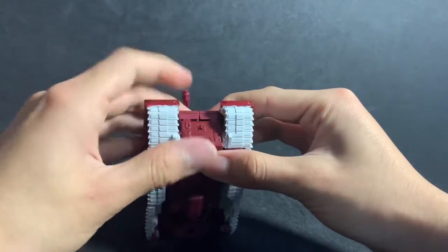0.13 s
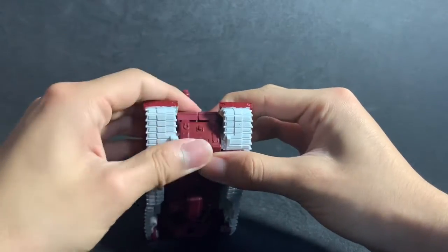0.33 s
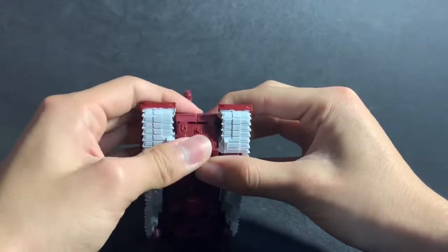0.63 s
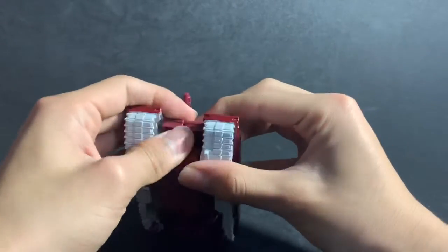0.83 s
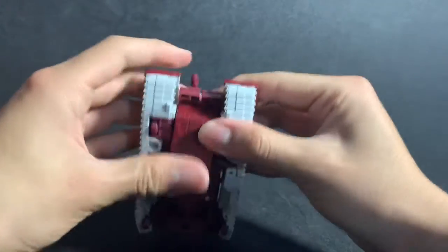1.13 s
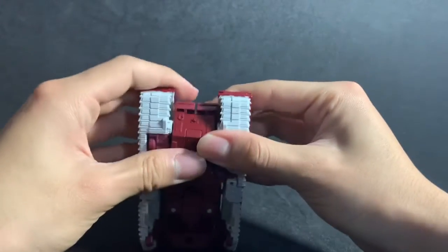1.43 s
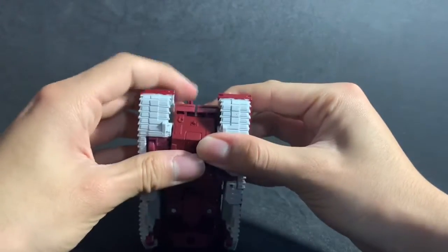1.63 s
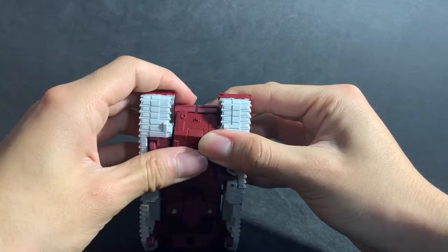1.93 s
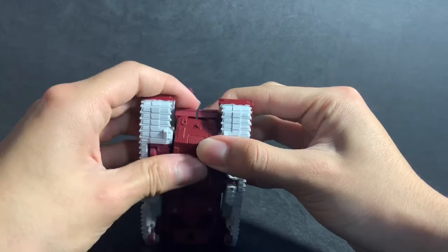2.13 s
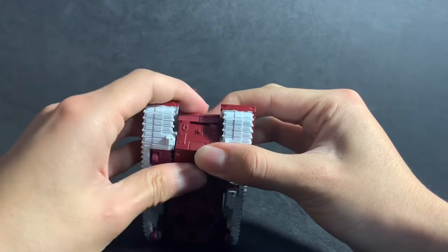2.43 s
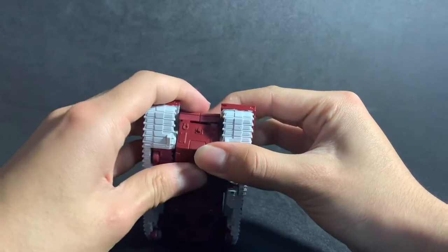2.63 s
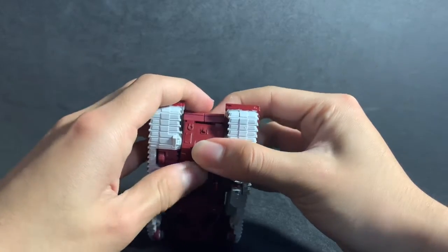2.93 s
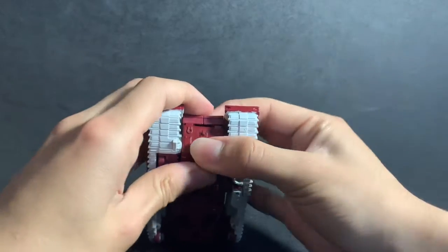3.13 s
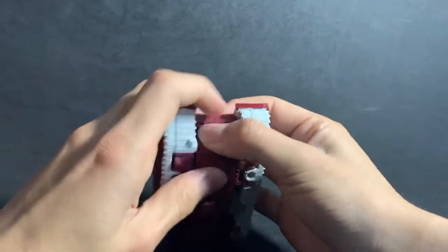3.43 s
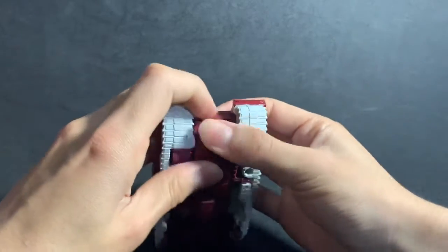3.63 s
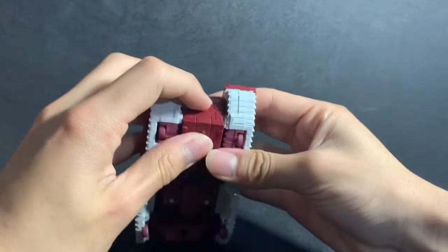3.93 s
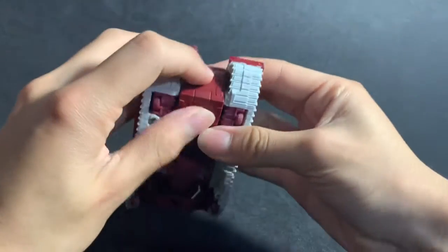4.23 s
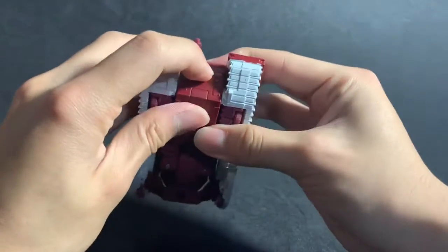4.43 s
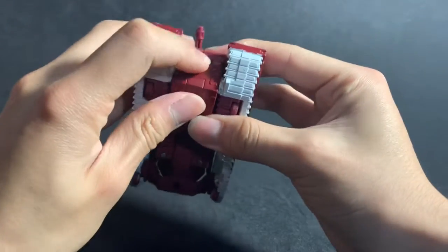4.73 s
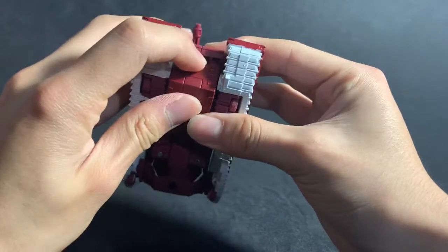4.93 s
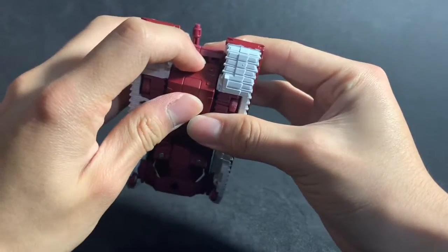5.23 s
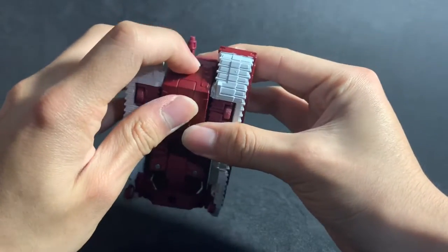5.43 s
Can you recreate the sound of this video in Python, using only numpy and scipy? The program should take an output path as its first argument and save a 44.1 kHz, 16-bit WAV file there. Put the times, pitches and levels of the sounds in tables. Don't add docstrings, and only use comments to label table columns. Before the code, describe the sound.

A quiet small room with low, distant rumble and very faint hiss, heard very close by a small camera microphone. A barely audible fingertip squeak and tiny dry ticks open, with skin rubbing harder until a loud, bright plastic snap at 0.7 s, several blows in a few milliseconds plus a deep thump. Ticks and hollow knocks gather at 0.84-1.05 s, then a softer clean snap at 1.18 and its double-struck partner at 1.23. A sharp tick comes at 1.37, a loud snap at 1.8. From 2.2 to 2.8 s there are light, scattered ticks; from 3.0 they become denser and firmer, with gritty skin slides. Loud snaps hit at 3.38 and 3.69 s, both with thumps, the last the loudest and clipped. Each has a short room tail. Smaller clicks at 3.55 and 3.6 fall between. Then mostly quiet: faint ticks around 4.1-4.35, a knock at 4.8, small clicks and rubs at 5.35-5.5 s.

```python
import sys
import numpy as np
from scipy import signal
from scipy.fft import rfft, irfft, next_fast_len
from scipy.io import wavfile
from scipy.ndimage import uniform_filter1d, map_coordinates

SR = 44100
rng = np.random.default_rng(int(sys.argv[2]) if len(sys.argv) > 2 else 0)


def voltage_ratio(decibels):
    exponent = np.asarray(decibels, float) / 20
    return 10 ** exponent


def persist_wave(psi):
    counts = np.round(np.clip(psi, -1, 1) * 32767).astype(np.int16)
    wavfile.write(sys.argv[1], SR, np.atleast_2d(counts).T)


N = 245625
SPAN = 16384


def unit(x):
    return x / np.sqrt(np.mean(x ** 2) + 1e-20)


def along(points, hz):
    f, v = np.transpose(points)
    return np.interp(np.log(hz + 1), np.log(f + 1), v)


def wobble(rate):
    knots = rng.standard_normal(int(N * rate / SR) + 4)
    return map_coordinates(knots, [np.arange(N) * rate / SR])


def filtered(x, response):
    n = x.shape[-1]
    m = next_fast_len(n + 4096)
    return irfft(rfft(x, m) * response(np.fft.rfftfreq(m, 1 / SR)), m)[..., :n]


def resonances(peaks):
    def response(f):
        return sum((-1) ** k * voltage_ratio(db) * 1j * f * width / (hz * hz - f * f + 1j * f * width)
                   for k, (hz, width, db) in enumerate(peaks))
    return response


def noise(spectrum, alike):
    a = rng.standard_normal((3, N))
    alike = np.clip(alike, 0, 1)
    pair = np.sqrt(alike) * a[0] + np.sqrt(1 - alike) * a[1:]
    return unit(filtered(pair, lambda hz: voltage_ratio(along(spectrum, hz))))


def pressure(start, hold, rise, fall):
    t = np.arange(N) / SR - start
    return voltage_ratio(20 * np.minimum(np.minimum(t / rise, (hold - t) / fall), 0))


def burst(start, length):
    u = np.maximum(np.arange(SPAN) / SR - start, 0) / max(length, .0004)
    return u ** .6 * np.exp(-u ** 1.4 * 2.5)


def chatter(shape, apart):
    a = rng.standard_normal((3, SPAN))
    uneven = voltage_ratio(2 * rng.standard_normal(SPAN))
    z = rfft(shape * uneven * (a[0] + apart * a[1:]))
    broad = np.abs(uniform_filter1d(np.abs(z) ** 2, size=450))
    return irfft(z / np.sqrt(broad + 1e-9), SPAN) * (shape > 1e-9)


# (frequency [Hz], t60 [s])
ROOM_T60 = [(200, 0.37), (1000, 0.23), (4000, 0.21), (9000, 0.25), (15000, 0.18)]


def echo(x, db, power):
    hz, t, z = signal.stft(rng.standard_normal((2, SPAN)), SR, nperseg=256)
    patches = uniform_filter1d(rng.standard_normal(z.shape[1:]), size=2, axis=0)
    patches = unit(uniform_filter1d(patches, size=6, axis=1))
    walls = 3 * np.exp(-t / .05) * rng.standard_normal(len(t))
    decay = 60 * t / along(ROOM_T60, hz)[:, None]
    tail = signal.istft(z * voltage_ratio(3.5 * patches + walls - decay), SR, nperseg=256)[1]
    tail = np.pad(tail, ((0, 0), (220, 0)))[:, :SPAN]
    treble_end = 1 + (np.fft.rfftfreq(SPAN, 1 / SR) / 14700) ** 60
    tail = irfft(rfft(tail) * np.sqrt(np.abs(power) / treble_end), SPAN)
    return x + voltage_ratio(db) * tail * np.linalg.norm(x) / np.linalg.norm(tail)


def add(out, s, x):
    out[:, round(s * SR):][:, :SPAN] += x


# (frequency [Hz], level [dB per Hz])
RUMBLE = [(15, -33.5), (25, -14.5), (65, -0.5), (152, -12), (193, -16.5), (281, -17), (500, -30),
          (650, -50.5), (1100, -120)]
# (frequency [Hz], level [dB per Hz])
HISS = [(150, -30), (300, 2.5), (700, -3.5), (2200, -8.5), (5000, -10.5), (8000, -12), (10000, -11.5),
        (14300, -10), (14900, -70.5)]
# (time [s], width [s], extra rumble [dB])
SHAKES = [
    (.02, .2, 2.5),
    (1.01, 0.12, 9),
    (3.4, 0.47, 4),
]


def room_tone():
    t = np.arange(N) / SR
    rumble_db = -64 + sum(db * np.exp(-((t - s) / width) ** 2) for s, width, db in SHAKES)
    rumble = voltage_ratio(rumble_db + 2.2 * wobble(12)) * noise(RUMBLE, 0.55)
    return rumble + voltage_ratio(-70.5) * noise(HISS, .1)


GRIP_S, LET_GO_S = .013, .03
# (frequency [Hz], level [dB per Hz])
SKIN = [(1800, -12.5), (3800, -4), (5500, -1), (7300, -4), (9000, -23.5)]
# (frequency [Hz], level [dB per Hz])
SKIN_HISS = [(6500, -18.5), (9000, 3.5), (11000, -0.5), (14300, -2), (15000, -58.5)]
# (frequency [Hz], level [dB per Hz])
SKIN_BODY = [(200, -20), (500, -5.5), (1100, -1.5), (2100, 0), (3000, -17.5)]
# (start [s], hold [s], level [dB], hiss [dB], body [dB])
STROKES = [(0.139, 0.012, -66, -3, -17), (0.18, .004, -66.5, -20.5, -7.5),
           (0.579, 0.026, -74.5, -13.5, -7.5), (0.973, 0.052, -62, 11, -5), (1.042, 0.0082, -60.5, 10, 7),
           (1.07, 0.037, -76.5, 10, -10), (1.091, 0.013, -66, 0.5, -15), (1.189, 0.04, -59, -8, -4),
           (1.359, 0.0091, -55.5, 9.5, -7), (1.411, 0.044, -66.5, 6, 1.5), (1.938, .12, -66.5, 5, 3.5),
           (2.671, 0.031, -57.5, 7, -9.5), (2.164, 0.31, -80, 0.5, -7), (2.896, 0.012, -67, 12, -13.5),
           (3.007, 0.0109, -58.5, -7, -3), (3.055, 0.014, -71.5, 16, 0.5), (3.174, 0.059, -60.5, 1, 0.15),
           (3.336, 0.032, -63, 3, -6), (3.549, .01, -54, -19, 2.5), (3.604, 0.057, -58.5, 5, -0.5),
           (3.799, 0.056, -63, -5.5, 3), (4.112, 0.076, -74.5, -1.5, -7), (4.2, 0.026, -64, -0.5, -21.5),
           (4.808, 0.0098, -61, -6, -13), (5.35, .02, -63.5, -4.5, -8.5), (5.376, 0.017, -56, -10, -13.5),
           (5.489, 0.012, -68.5, -19, 3)]
# (end [s], time to gain 20 dB [s], level [dB], hiss [dB], body [dB])
PRESSES = [
    (.7, 0.09, -54, 4.5, -14.5),
    (1.178, 0.03, -49, 2, 2),
    (1.229, 0.02, -57, -0.5, -4),
    (3.383, .015, -55, -3, -6),
    (3.688, 0.03, -52.5, -3.5, -8),
]


def rubbing():
    touches = [(pressure(s, hold, GRIP_S, LET_GO_S), *db) for s, hold, *db in STROKES]
    touches += [(pressure(s, 0, rise, GRIP_S), *db) for s, rise, *db in PRESSES]
    skin, hiss, body = sum(gain * voltage_ratio([[db], [db + hiss_db], [db + body_db]])
                           for gain, db, hiss_db, body_db in touches)
    grit = unit(voltage_ratio(3.5 * wobble(300) + 0.6 * wobble(60)))

    def uneven():
        return unit(voltage_ratio(1.6 * wobble(30)))

    ribs = resonances([(3750, 700, 0), (7350, 700, 0)])
    shell = unit(filtered(noise(SKIN, 0.54), lambda f: 1.0 + ribs(f)))
    rub = skin * uneven() * shell
    rub = rub + hiss * uneven() * noise(SKIN_HISS, 0.38)
    rub = rub + body * uneven() * noise(SKIN_BODY, 0.19)
    return grit * rub


# (start [s], length [s], level [dB], frequency [Hz], width [Hz])
SQUEAKS = [
    (0.001, .15, -75.5, 7020, 305),
    (0.5, 0.089, -79, 3650, 300),
    (1.091, .016, -66, 4200, 600),
    (.975, 0.034, -63.5, 5160, 700),
    (4.6, .03, -72, 4050, 700),
    (1.19, .03, -56, 13700, 900),
]


def squeaks():
    out = np.zeros(N)
    for s, hold, db, hz, width in SQUEAKS:
        rib = resonances([(hz, width, 0)])
        band = unit(filtered(rng.standard_normal(N), lambda f: rib(f) ** 2))
        out += voltage_ratio(db + 3.5 * wobble(53)) * pressure(s, hold, GRIP_S, GRIP_S) * band
    return out


# (time [s], peak [dB], frequency [Hz], t60 [s])
BUMPS = [(.15, -52.5, 191, 0.064), (.839, -42, 1450, 0.035), (1.504, -46, 1233, 0.037),
         (2.622, -50, 1310, 0.032), (1.171, -32, 1450, 0.032), (0.986, -41, 302, 0.08),
         (1.015, -45.5, 227.2, 0.22), (1.047, -36, 419.7, 0.024), (1.978, -55, 279, 0.12),
         (2.766, -47.5, 326, 0.074), (3.014, -49, 300, .06), (3.187, -44, 322, 0.085),
         (3.237, -55.5, 347, 0.13), (3.786, -37.5, 1511, 0.11), (4.81, -50.5, 900, 0.03),
         (5.371, -53.5, 329.8, 0.048)]


def bumps():
    out, t = np.zeros((2, N + SPAN)), np.arange(SPAN) / SR
    for s, db, hz, t60 in BUMPS:
        drift = np.cumsum(rng.standard_normal(SPAN)) * 0.14
        envelope = voltage_ratio(db - 60 * t / t60) * (1 - np.exp(-t / 0.0024))
        add(out, s, envelope * np.sin(2 * np.pi * hz * t + drift))
    return out[:, :N]


# (time [s], peak [dB], frequency [Hz], t60 [s])
THUMPS = [(0.707, -23, 89, 0.13), (.708, -35, 250, 0.11), (.735, -42.5, 159, 0.14),
          (0.776, -40, 85.6, 0.11), (.99, -43, 159, 0.095), (1.029, -42, 135.4, 0.053),
          (1.045, -47, 85.7, 0.11), (1.245, -49.5, 129.8, 0.11), (1.798, -45, 119.6, 0.13),
          (3.39, -25, 80, 0.11), (3.387, -32, 160, 0.14), (3.44, -39, 164.6, 0.11), (3.45, -41.5, 70, .2),
          (3.697, -27, 110, .08), (3.693, -33.5, 298.2, .07), (3.695, -35, 45.05, 0.16),
          (3.78, -42, 165.4, 0.15), (3.8, -43.5, 80, 0.13)]


def thumps():
    out, t = np.zeros((2, N + SPAN)), np.arange(SPAN) / SR
    for s, db, hz, t60 in THUMPS:
        turns = hz * (t + 0.0044 * (1 - np.exp(-t / 0.0048)))
        envelope = voltage_ratio(db - 60 * t / t60) * (1 - np.exp(-t / 0.0061))
        add(out, s, envelope * np.sin(2 * np.pi * turns))
    return out[:, :N]


# (time [s], peak [dB], ring [Hz], crack [dB])
TICKS = [(0.1435, -46, 7260, -22), (0.153, -55, 4380, -23), (0.182, -43, 3500, -28),
         (0.5709, -51, 6560, -14), (0.943, -38.5, 7250, -23), (0.952, -45, 7266, -22),
         (.986, -34, 4870, -1.5), (1.74, -52, 4300, -9), (2.17, -45, 3870, -19), (2.199, -54.5, 6923, 6),
         (2.2054, -38.5, 3710, -24), (2.233, -37, 3710, -5.5), (2.267, -43.5, 3480, -35),
         (2.311, -49, 7640, -4.5), (2.4521, -53, 3390, 2.5), (2.458, -57, 6500, 6),
         (2.583, -46.5, 7600, -4.5), (2.7936, -41, 6050, -26), (2.9484, -47.5, 4450, -12.5),
         (2.974, -52, 5180, 0), (3.4101, -32, 2935, -17), (3.626, -45.5, 3200, -19),
         (4.0848, -55.5, 5420, -4), (4.3082, -44, 2614, -22.5), (4.351, -43, 3536, -7.5),
         (5.3753, -34, 3260, -17.5)]
# (time [s], peak [dB], ring [Hz], knock [dB], crack [dB])
KNOCKS = [(0.8389, -58, 3058, -6, -25.5), (.858, -26, 4054, -7, -17.5), (0.9684, -39, 5090, -6.5, -2),
          (.9989, -37.5, 4630, -6, -19.5), (1.0434, -48, 4700, 3.5, 8.5), (1.1625, -43.5, 4000, 6, -11.5),
          (1.171, -37.5, 3500, 8, -12.5), (1.366, -25.5, 4100, -12.5, -13.5),
          (1.5044, -49.5, 2960, 6.5, -29.5), (1.7495, -51.5, 4260, 2.5, -16), (2.303, -42, 3730, -7.5, -8),
          (2.387, -48.5, 4090, -7.5, -5), (2.4336, -63, 3590, 14, -7), (2.6222, -54, 3740, 8.5, -13),
          (2.6666, -49.5, 3230, 6, -4), (2.7673, -44, 6250, -9.5, -9), (3.014, -38.5, 3970, 3.5, -13),
          (3.0239, -39.5, 2610, -13, -10.5),
          (3.1055, -51, 3577, 4, -20.5), (3.1661, -36.5, 8390, 1.3, -11), (3.137, -53.5, 3500, 4, -20),
               (3.1823, -24, 2576, -7, -12.5), (3.2202, -36.5, 3430, -5.5, 1),
               (3.3221, -54, 2690, -8.5, -10), (3.336, -30, 8220, -10, -4), (3.3593, -35, 3500, -6.5, -8.5),
               (3.549, -31, 3000, -2, -19), (3.606, -31, 4078, 2.5, -3.5), (4.809, -39, 2796, 0, -13),
               (5.383, -39.5, 4100, -2, -20), (5.4937, -46.5, 3720, 3.5, -20)]
# (frequency [Hz], level [dB])
TICK_SENT = [(300, -8), (2500, 11.5), (6000, -4.5), (10000, -9.5), (15000, -12.5)]
DRY_KNOCK_DB, TICK_ROOM_DB, KNOCK_ROOM_DB = -23, -10, -9.5
TICK_S, LONGER_PER_DB = 0.00091, 0.07


def ticks():
    out, hz = np.zeros((2, N + SPAN)), np.fft.rfftfreq(SPAN, 1 / SR)
    slips = [(s, db, ring_hz, DRY_KNOCK_DB, crack_db, TICK_ROOM_DB) for s, db, ring_hz, crack_db in TICKS]
    slips += [(*row, KNOCK_ROOM_DB) for row in KNOCKS]
    for s, db, ring_hz, knock_db, crack_db, room_db in slips:
        length = TICK_S * max(1.5 + LONGER_PER_DB * (db + 45.5), .5)
        blow = chatter(burst(0, length), apart=0.95)[:, :2048]
        ring = [(ring_hz, 850, 0), (1.7 * ring_hz, 900, -8), (5000, 5000, -17)]
        hollow = [(595, 2600, -10.0), (1050, 1400, 1.5), (1640, 1500, 2)]
        crack = [(9800, 12000, 0.0045), (13700, 1200, 0.0008)]
        tick = 0
        for level, peaks in [(0, ring), (knock_db - 0.5, hollow), (crack_db + 3.0, crack)]:
            rung = filtered(blow, resonances(peaks))
            tick = tick + voltage_ratio(db + level) * rung / np.abs(rung[0]).max()
        tick = tick * voltage_ratio([[0], [-2.5]])
        tick = np.pad(tick, ((0, 0), (0, SPAN - 2048)))
        broad = uniform_filter1d(np.abs(rfft(tick[0])) ** 2, size=300)
        add(out, s, echo(tick, room_db, broad * voltage_ratio(2 * along(TICK_SENT, hz))))
    return out[:, :N]


# (time [s], peak [dB], room [dB])
SNAPS = [
    (0.7052, -0.5, -10),
    (1.1801, -8.5, -15.5),
    (1.2305, -12, -11),
    (1.7936, -2, -12.5),
    (3.382, -2.5, -13.5),
    (3.6907, 3.5, -11),
]
# (time [s], level [dB], length [s])
BLOWS = [
    [(.7058, -4, .0025), (.7082, -0.5, 0.0022), (.7104, -3, .002), (.7152, -14, .003), (.7243, -19.5, .002),
     (.7298, -17.5, 0.0015), (.7352, -21.5, .0015)],
    [(1.1804, 0, .0015)],
    [(1.2308, -4, 0.0018), (1.232, -0.5, .002), (1.2404, -20, .0015)],
    [(1.7945, -25, .003), (1.7977, 1.5, .002), (1.8013, -14.5, .002), (1.8053, -19.5, .002),
     (1.8135, -21.5, .002), (1.83, -24, .0015)],
    [(3.3825, -16.5, .003), (3.3852, -6, .0025), (3.3876, 0, .0014), (3.3913, -12, 0.0019),
     (3.4022, -21.5, .003), (3.4065, -23, .002)],
    [(3.6911, 1, .0018), (3.693, 1.5, 0.00094), (3.6944, -2.5, 0.0013), (3.697, -14.5, 0.0022),
     (3.7008, -16.5, 0.0017), (3.7042, -20, .0015), (3.7088, -22.5, .003)],
]
# (frequency [Hz], width [Hz], level [dB])
SHELLS = [
    [(1667, 980, -11), (3270, 200, -3.5), (3710, 110, -5), (5168, 850, -7), (7520, 860, -15),
     (7700, 200, -15), (7943, 810, -18.5), (11180, 370, -2), (13640, 310, -7)],
    [(1450, 310, -11), (4300, 360, -5), (6140, 370, -2), (8240, 240, -4), (10200, 600, -10.5),
     (14200, 900, 2.5)],
    [(1071, 500, -7.5), (3500, 1500, -5), (6180, 110, -5), (7600, 2400, -3), (9200, 880, -6),
     (12300, 1500, -3)],
]
# (frequency [Hz], width [Hz], level [dB])
LATE_SHELLS = [
    [(1430, 420, -8.5), (3695, 250, -9.5), (4300, 560, 1.5), (5355, 390, 6.5), (6050, 520, 1.5),
     (6950, 230, -8.5), (7600, 750, -5.5), (10716, 680, 2), (12500, 370, -15.5)],
    [(1120, 250, -9.5), (3000, 330, 0.5), (4630, 330, -2), (5125, 120, 2), (6500, 160, -5.5),
     (8100, 580, -6), (10460, 240, -3.5), (10800, 440, -5.5), (12900, 220, -10.5)],
    [(2500, 160, -5.5), (4300, 320, -3), (5800, 1100, -9.5), (7270, 490, -1.5), (8000, 160, -10),
     (10100, 260, -15), (10270, 5200, -16), (13580, 560, -15.5), (13400, 330, -16.5)],
]
# (frequency [Hz], level [dB per Hz])
SENT = [
    [(150, -39), (250, -15), (788, -21.5), (3680, -4), (10300, -25.5), (11800, -23.5), (13500, -12.5),
     (15000, -31.5)],
    [(150, -50.5), (250, -24.5), (5010, -7), (5850, -2), (11800, -18), (13800, -1), (15000, -19.5)],
    [(150, -42), (250, -16.5), (1670, -15.5), (2530, 0), (11800, -20), (13300, -15.5), (15000, -29)],
    [(150, -50), (250, -27), (2500, -12.5), (5380, -2), (10600, -17), (12000, -22.5), (13300, -14),
     (15000, -43.5)],
    [(150, -39), (250, -13), (2100, -14), (3050, -2.5), (10600, -19.5), (11800, -18), (13100, -14),
     (15000, -31.5)],
    [(150, -33), (250, -10.5), (1050, -22), (2400, -1.5), (7180, -7.5), (11600, -19.5), (13100, -17),
     (15000, -62)],
]
SOFT_HZ, SOFT_LOSS = 6000, 0.7


def snaps():
    out, hz = np.zeros((2, N + SPAN)), np.fft.rfftfreq(SPAN, 1 / SR)
    for (s, db, room_db), blows, peaks, sent in zip(SNAPS, BLOWS, SHELLS + LATE_SHELLS, SENT):
        shell = resonances(peaks)
        shape = sum(voltage_ratio(level) * burst(at - s, length) for at, level, length in blows)
        crisp = sum(voltage_ratio(level * (1 + SOFT_LOSS)) * burst(at - s, length) for at, level, length in blows)
        blow = chatter(shape, apart=1.0)
        dull = filtered(blow, lambda f: 1 / (1 + (f / SOFT_HZ) ** 4))
        blow = dull + (blow - dull) * crisp / (shape + 1e-6)
        body = filtered(blow, shell) + voltage_ratio(-20.5) * blow
        body = filtered(body, lambda f: (1j * f / (1j * f + 600)) ** 2)
        body = voltage_ratio(db + 4.5) * body / np.abs(body).max()
        modes = np.abs(shell(hz)) ** 2 + 1e-4
        modes = (modes / uniform_filter1d(modes, size=600)) ** 0.12
        add(out, s, echo(body, room_db, modes * voltage_ratio(2 * along(sent, hz))))
    return out[:, :N]


def scene():
    return room_tone() + rubbing() + squeaks() + bumps() + thumps() + ticks() + snaps()


def roll_off(x):
    return signal.sosfilt(signal.butter(12, 15740, fs=SR, output="sos"), x)


def record(dry):
    ahead = np.exp(-np.arange(1024) / SR / 0.0049) * rng.standard_normal(1024)
    ahead = signal.lfilter([1], [1, -.6], ahead)
    ahead = ahead[None, ::-1] / np.linalg.norm(ahead)
    dry = dry + voltage_ratio(-20.5) * signal.fftconvolve(dry, ahead, axes=1)[:, 1023:]
    turn_hz, comb_hz, bass_hz, mono_hz = 2250, 3200, 250, 7900

    def turn(f):
        low = -np.pi * (f / turn_hz) ** 2.1
        high = 2 * np.pi * (f - turn_hz) / comb_hz - np.pi
        return np.exp(1j * np.where(f < turn_hz, low, high))

    def own(f):
        return f * f / (f * f + bass_hz ** 2) / (1 + (f / mono_hz) ** 40)

    def keep(ratio, f):
        return 1 - (1 - own(f)) * (f > comb_hz) * 0.8 / (1 + (np.abs(ratio) / 0.7) ** 6)

    right = filtered(dry[1], lambda f: turn(f) * np.sqrt(own(f)))
    right = right + filtered(dry[0], lambda f: turn(f) * np.sqrt(1 - own(f)))
    mid = filtered(dry[0] + right, lambda f: keep(1 + turn(f), f)) / 2
    side = filtered(dry[0] - right, lambda f: keep(1 - turn(f), f)) / 2
    right = filtered(mid - side, lambda f: voltage_ratio(-0.01 - 2.5 / (1 + (f / 500) ** 2)))
    pair = filtered(np.array([mid + side, right]), lambda f: 1 / np.sqrt(1 + (f / 15200) ** 30))
    return roll_off(np.clip(pair, -1, 1))


dry = scene()
out = record(dry)
persist_wave(out)
```